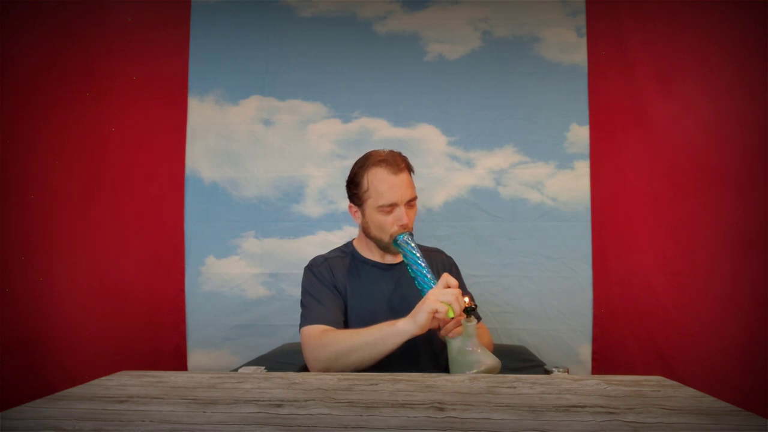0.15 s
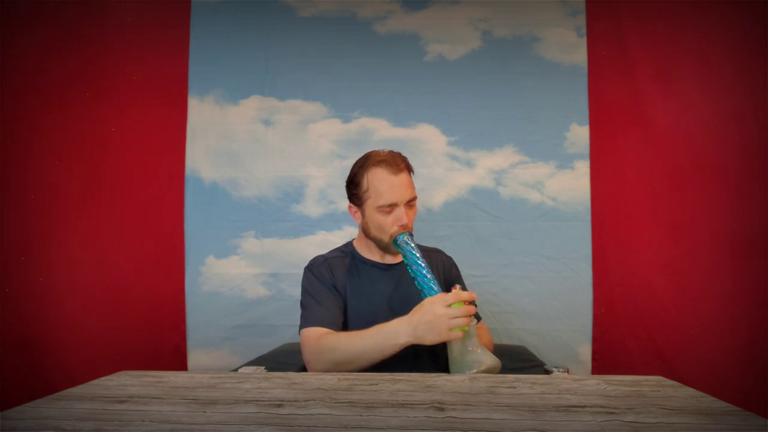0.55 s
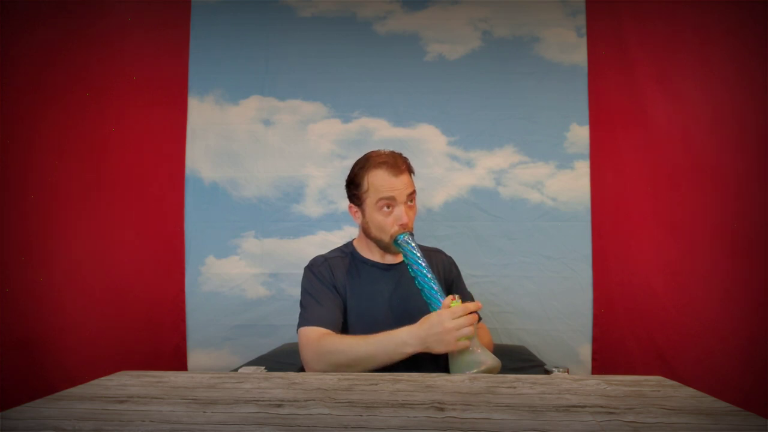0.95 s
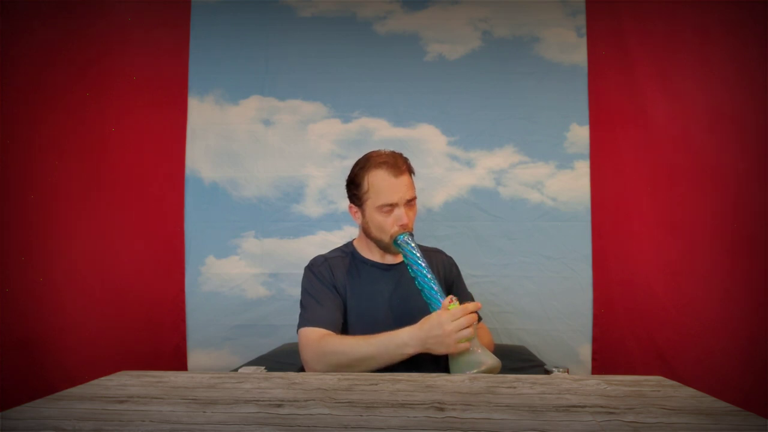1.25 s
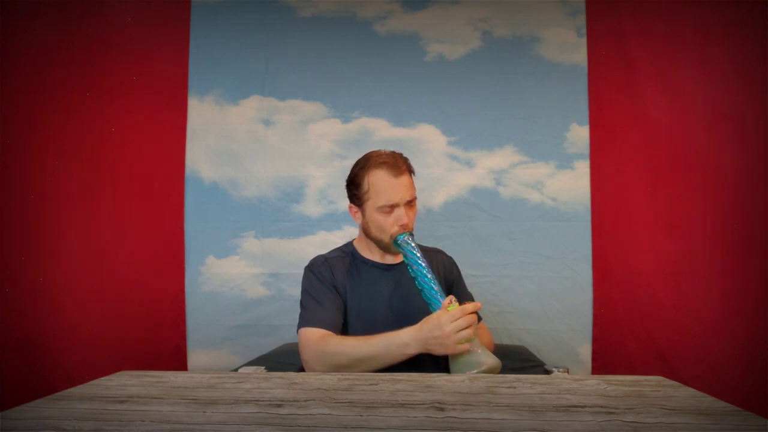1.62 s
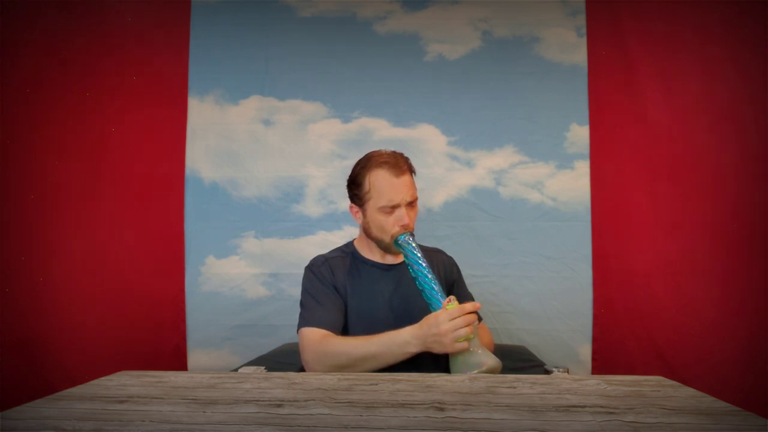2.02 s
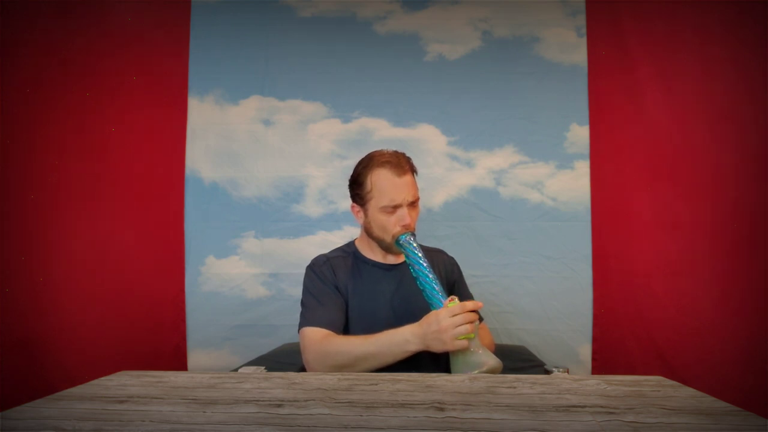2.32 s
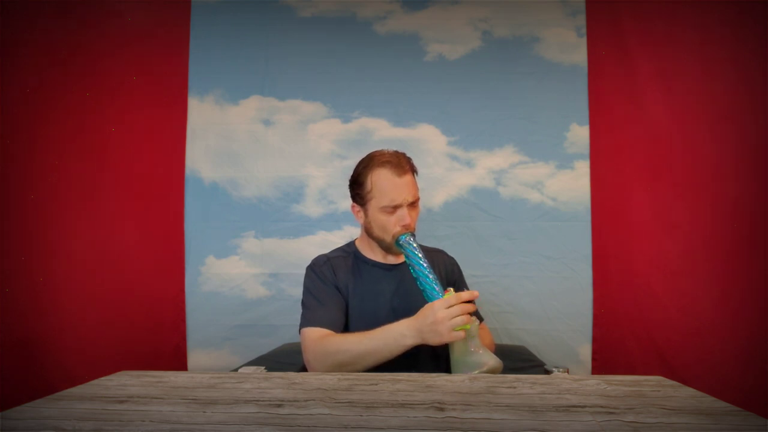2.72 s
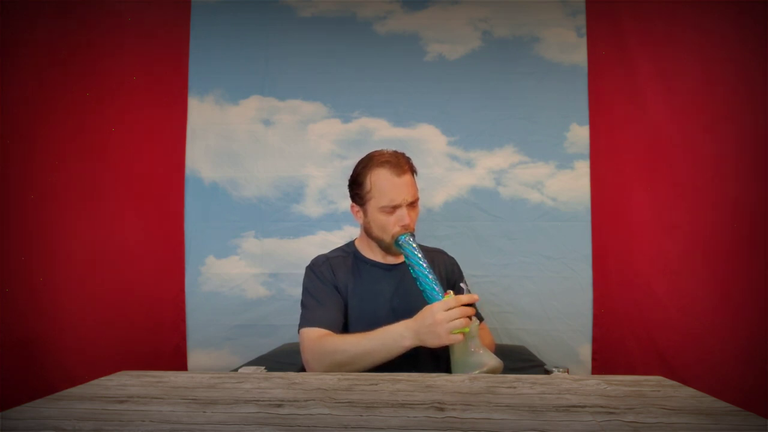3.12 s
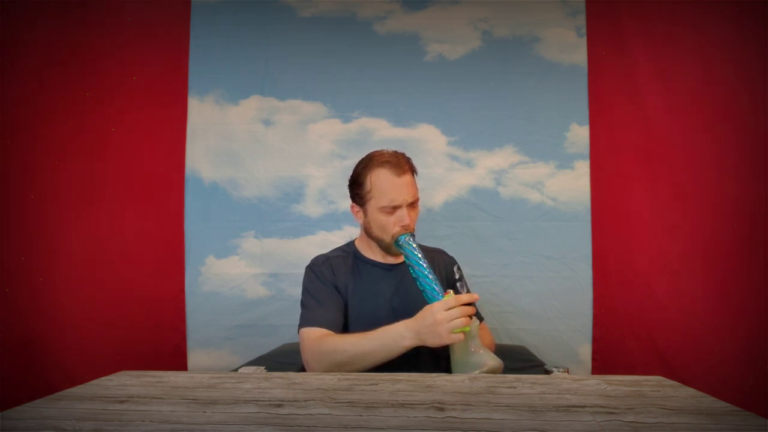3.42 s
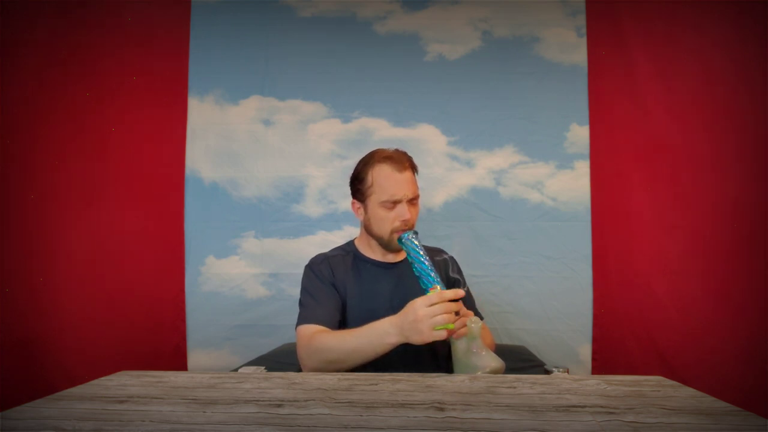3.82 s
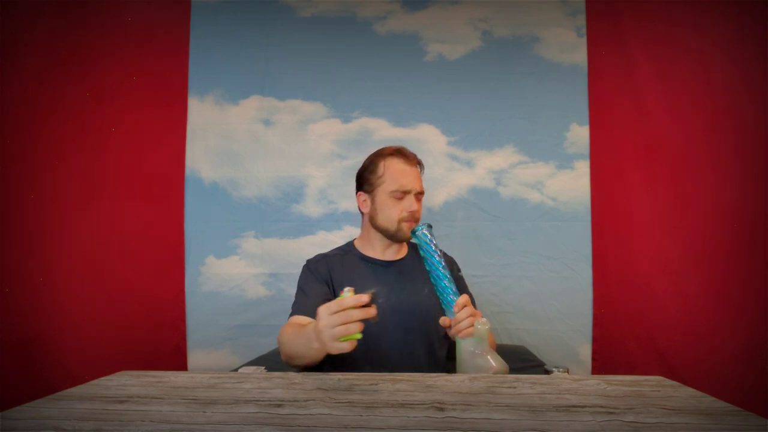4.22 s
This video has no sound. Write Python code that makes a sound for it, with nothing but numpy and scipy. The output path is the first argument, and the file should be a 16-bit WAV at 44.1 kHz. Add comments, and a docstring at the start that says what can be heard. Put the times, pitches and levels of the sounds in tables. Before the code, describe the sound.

In a quiet, slightly live room, a glass water pipe sits a little way from one microphone. Faint plips and light glass ticks come first, then the bowl scrapes out of its joint with a bright clink around two seconds. A thin airy whistle leads into fast, dense bubbling that swells, gurgling and spraying, then stops suddenly with a few last bubbles, leaving low room rumble.

```python
"""In a quiet, slightly live room, a glass water pipe is smoked a little way off from one microphone.
A gentle draw makes the water plip, as decaying sines of rising pitch, and fingers tick on the glass,
as noise bursts through its resonances. The bowl scrapes out of its joint as irregular slips, then
air rushes through the water: swarms of bubbles swell into a gurgle with spray and a heaving air column.
It stops with a last few bubbles; whistles are noise bands, handling rustles in grains, the room rumbles."""
import sys
import numpy as np
from scipy import signal
from scipy.fft import rfft, irfft, next_fast_len
from scipy.io import wavfile
from scipy.ndimage import uniform_filter1d, map_coordinates

SR = 44100
rng = np.random.default_rng(int(sys.argv[2]) if len(sys.argv) > 2 else 0)


def unload_wav(signal):
    """Save mono or channel-first audio to the path in sys.argv[1] as 16-bit WAV at rate SR, clipped to [-1, 1]."""
    wavfile.write(
        sys.argv[1],
        SR,
        np.round(np.clip(np.atleast_2d(signal).T, -1, 1) * 32767).astype(np.int16),
    )


N = 191913  # samples

# The draw, gentle while the bowl is in and strong once it is out: time_s, flow_db (re full flow)
DRAW_FLOW = [(0.0, -26.5), (0.35, -22), (1.15, -31), (1.6, -25), (2.0, -30.5), (2.16, -19), (2.36, -20.5),
             (2.6, -8.5), (2.8, -6), (3.02, -4.5), (3.32, 0.5), (3.78, 0.5), (3.82, -18)]
# Big slugs of air burst through about five times a second: start_s, swell_db
AIR_SLUGS = [(2.526, 4), (2.695, 7), (2.881, 5.5), (3.092, 4), (3.311, 3.5), (3.549, 4), (3.742, 3.5)]
# How unevenly the air gulps through the water: time_s, unevenness_db
GULP_DEPTH = [(2.6, 3.5), (3.3, 3.5)]
# Colour of the bubbling mass: freq_hz, level_db (per Hz)
WATER_COLOUR = [(250, 3.5), (390, -21), (470, -5), (630, -3), (900, -1), (1250, -3), (1520, 4.5),
                (2000, -17), (2420, 3), (2800, -19), (4000, -1.5), (7000, -79)]
# Resonances of the water chamber: freq_hz, width_hz, level_db
CHAMBER_MODES = [(477.6, 5, 11.5), (515, 24, -7.5), (606, 3.6, 9.5), (736, 12.4, 4), (934, 19, -26),
                 (1020, 33, 0.5), (1420, 27, -5.5), (1544, 23, -0.5), (2310, 57, 2), (2440, 46, -23)]
# Colour of the spray: freq_hz, level_db (per Hz)
SPRAY_COLOUR = [(1200, -5), (2400, -3), (3150, -3.5), (3700, -6.5), (5000, -0.5), (6200, -7), (6800, -6),
                (7300, -16.5), (8000, -12), (9500, -15), (11000, -26), (15000, -40)]
# Resonances of the air column in the tube: freq_hz, width_hz, level_db
TUBE_MODES = [(57.7, 42, 0), (108.4, 29, -5.5), (195.6, 28, -1.5), (264, 23, -6), (315, 15, -27)]
# Single loud bubbles: start_s, ring_peak_db, pitch_hz
LOUD_BUBBLES = [(0.0883, -55.5, 2430), (0.43, -52, 1140), (0.4882, -56, 2210), (0.87, -53.5, 1170),
                (1.2267, -59, 763), (1.5363, -51, 1404), (1.6388, -56, 1411), (1.768, -55.5, 1224),
                (1.8468, -57.5, 2465), (2.135, -49.5, 436), (2.3712, -45, 1260), (2.5307, -37, 752),
                (2.5312, -42, 1160), (2.5805, -35, 682), (2.6432, -38, 465), (2.6711, -32.5, 4850),
                (2.7006, -31, 1000), (2.709, -29.5, 3090), (2.7161, -35.5, 4880), (2.7201, -39.5, 3160),
                (2.8856, -41, 716), (2.8947, -35, 636), (2.9321, -35, 2290), (2.9436, -45, 1500),
                (3.1, -29, 1590), (3.1236, -33, 765), (3.2258, -31.5, 4820), (3.2552, -35.5, 507),
                (3.317, -29.5, 1735), (3.3255, -32.5, 634), (3.4308, -35, 910), (3.478, -28, 5040),
                (3.5576, -31, 510), (3.5791, -30, 2440), (3.623, -34, 1570), (3.6406, -31, 700),
                (3.6838, -34.5, 704), (3.75, -33, 1670), (3.7652, -31, 590), (3.7747, -30, 4170),
                (3.7765, -36.5, 2510), (3.8316, -35, 544), (3.8445, -31.5, 840)]
# Distinct contacts on the glass: start_s, peak_db, low_db (re middle), high_db (re middle)
GLASS_TAPS = [(.078, -54.5, 15, -11), (.248, -58, 14, -11), (.262, -49.5, 12, 4), (.702, -46, -24, -1),
              (.796, -34.5, 5, 10), (.819, -39.5, -1, -5), (.831, -42, 6, -25), (.944, -45, -14, -5),
              (1.048, -43.5, -16, 9), (1.477, -48, 1.5, -16), (1.534, -53.5, -18, -14),
              (1.744, -55, 6, -24), (2.084, -22.5, -5.5, -4), (2.12, -30.5, -11, -13),
              (2.131, -28.5, 0.5, -7.5), (2.372, -44, 5, -16)]
# Resonances of pipe and bowl: freq_hz, width_hz, level_db
GLASS_MODES = [(1090, 46, -9.5), (1400, 20, 3), (2290, 180, 11), (2480, 26, -22.5), (3020, 53, -27),
               (3157, 390, 7), (3580, 89, 15), (4100, 28, -14), (5500, 23, 2)]
# What the glass radiates: freq_hz, level_db (per Hz)
GLASS_COLOUR = [(150, -28), (430, -9), (930, -3), (1020, 5.5), (1800, -5.5), (2600, 0.5), (4500, -1),
                (6400, -4.5), (6850, -19), (15000, -39)]
# Glass left ringing by a touch: start_s, level_db, pitch_hz, t60_s
GLASS_RINGS = [(1.048, -68, 3520, 0.71), (1.048, -67.5, 4640, 0.22), (.796, -48, 2340, 0.038),
               (.796, -47, 4210, 0.019), (1.535, -75.5, 3500, 0.8), (2.084, -49.5, 1408, 0.78),
               (2.084, -47, 1080, 0.14)]
# Air whistling in the open stem: start_s, end_s, pitch_hz, width_hz, level_db
STEM_WHISTLES = [(2.37, 2.53, 2440, 260, -69), (2.50, 2.69, 2440, 260, -59.5), (2.57, 2.67, 3920, 400, -60),
                 (2.53, 2.68, 11300, 500, -80.5), (2.82, 2.92, 9600, 1200, -72.5)]
# Decay of the room: freq_hz, t60_s
ROOM_DECAY = [(100, 0.52), (300, 0.43), (800, 0.55), (3000, 0.49), (6000, 0.45), (12000, 0.6)]
# Colour of the room's rumble: freq_hz, level_db (per Hz)
RUMBLE_COLOUR = [(10, -50), (24, -15), (38, -4), (65, -1.5), (105, -3.5), (160, -11.5), (280, -14.5),
                 (500, -24.5), (1300, -26), (2000, -37.5), (3000, -34.5), (4500, -32.5), (7300, -40.5),
                 (15500, -44.5)]
# Level below which the right channel's noise suppressor acts: freq_hz, threshold_db (per bin)
SUPPRESSOR_THRESHOLD = [(60, -60), (300, -58), (1000, -71.5), (3000, -81), (6000, -85), (11000, -68)]

STOP_S = 0.032  # the water settles this fast when the draw ends
SLUG_ATTACK_S, SLUG_HOLD_S, SLUG_RELEASE_S = 0.0031, 0.01, 0.048
SLUG_SPRAY, SLUG_HEAVE = 0.43, 0.53  # shares of a slug's swell that reach spray and air column
# Levels at full flow: bubbling mass, droplets, finest fizz, rocking water
GURGLE_DB, SPRAY_DB, FIZZ_DB, HEAVE_DB = -48, -49.5, -47, -49
SPRAY_GROWS, FIZZ_GROWS, HEAVE_GROWS = 1.48, 2.07, 0.67  # dB per dB of flow
FIZZ_HZ = 5800  # the fizz is the spray above this pitch
# Small, high bubbles ring for more cycles: cycles at full flow, at this pitch, power of pitch
LIFE_CYCLES, LIFE_AT_HZ, LIFE_GROWS = 17, 1020, 0.56
LIFE_DAMPED = 0.18  # churning water cuts the ring short: dB of life lost per dB of flow
# A loud bubble's splash: level re its ring at full flow, dB per dB of flow, decay time
SPLASH_DB, SPLASH_GROWS, SPLASH_S = 0, 0.37, 0.003
SPLASH_SKIRT_DB = -14  # fall of the splash at a third and at three times the bubble's pitch
# The shifting grip ticks faintly at random
GRIP_START_S, GRIP_END_S = 0.26, 2.1
GRIP_DB, GRIP_SPREAD_DB, GRIP_LOW_DB, GRIP_HIGH_DB = -62, 4, 6.5, -2
RUSTLE_DB, RUSTLE_END_S, RUSTLE_FADE_S = -80.5, 1.0, 0.091  # faint grainy rustle under the handling
RUB_S, RUB_WIDTH_S, RUB_DB = 0.75, 0.04, 14.5  # a finger rubs across the glass: swell over the rustle
TOP_HZ = 15600  # upper band limit


def amp(db):
    """Decibels to gain."""
    return 10 ** (np.asarray(db) / 20)


def unit(x):
    """Scale to rms 1."""
    return x / np.sqrt(np.mean(x ** 2) + 1e-20)


def along(points, hz):
    """Read (Hz, value) points on a log frequency axis."""
    freq, value = np.transpose(points)
    return np.interp(np.log(hz + 1), np.log(freq + 1), value)


def filtered(x, response):
    """Shape the spectrum of x with a response of frequency."""
    n = x.shape[-1]
    padded = next_fast_len(n + SR // 4)
    spectrum = rfft(x, padded) * response(np.fft.rfftfreq(padded, 1 / SR))
    return irfft(spectrum, padded)[..., :n]


def coloured(x, points):
    """Causal, minimum-phase filter with the gain of (Hz, dB) points."""
    size = 4096
    gain = amp(along(points, np.fft.rfftfreq(size, 1 / SR)))
    cepstrum = irfft(np.log(gain))
    # folding the cepstrum puts the energy as early as possible
    cepstrum[1:size // 2] *= 2
    cepstrum[size // 2 + 1:] = 0
    impulse = irfft(np.exp(rfft(cepstrum)))
    return signal.fftconvolve(x, impulse)[:len(x)]


def resonate(x, modes):
    """Pass x through parallel (Hz, width, dB) resonances."""
    def response(f):
        return sum(amp(db) * 1j * f * w / (c * c - f * f + 1j * f * w) for c, w, db in modes)
    return filtered(x, response)


def narrow(hz, width, size):
    """Noise of rms 1 in one narrow band."""
    noise = rng.standard_normal(size)
    return unit(filtered(noise, lambda f: 1 / (1 + (2 * (f - hz) / width) ** 4)))


def add(track, s, sound):
    """Mix a sound into a track at s seconds."""
    part = track[max(round(s * SR), 0):][:len(sound)]
    part += sound[:len(part)]


def bubble(t, hz, life, rise):
    """A pocket of air falls 60 dB in life cycles; its pitch climbs as it nears the surface."""
    turns = t * hz
    age = turns / life
    envelope = amp(-60 * age) * (1 - np.exp(-2 * turns))
    return envelope * np.sin(2 * np.pi * turns * (1 + rise * age / 2))


def swarm(rate, low_hz, high_hz, life, spread_db, size):
    """Countless ringing grains of random moment, pitch, life and strength, at rms 1; rate per second."""
    u = rng.random((int(rate * N / SR), 5))
    hz = low_hz * (high_hz / low_hz) ** u[:, 1:2]
    lives = life * 2 ** (2 * u[:, 3:4] - 1)
    boost_db = spread_db * np.minimum(-np.log(u[:, 2:3]), 3)
    polarity = np.sign(u[:, 4:5] - .5)
    strength = amp(boost_db) * np.sqrt(hz / low_hz) * polarity
    grains = strength * bubble(np.arange(size) / SR, hz, lives, rise=0.26)
    where = (u[:, :1] * N).astype(int) + np.arange(size)
    return unit(np.bincount(where.ravel(), grains.ravel(), N)[:N])


def bubbling():
    """One air flow heaves the air column, frees ringing bubbles and throws spray, finer as it grows."""
    t = np.arange(N) / SR
    flow_db = np.interp(t, *np.transpose(DRAW_FLOW))
    slug_db = slugs()
    drawing = np.clip(1 - (t - DRAW_FLOW[-1][0]) / STOP_S, 0, 1)
    gurgle_gain = amp(GURGLE_DB + flow_db + slug_db)
    spray_gain = amp(SPRAY_DB + SPRAY_GROWS * flow_db + SLUG_SPRAY * slug_db)
    fizz_gain = amp(FIZZ_DB + FIZZ_GROWS * flow_db + SLUG_SPRAY * slug_db)
    heave_gain = amp(HEAVE_DB + HEAVE_GROWS * flow_db + SLUG_HEAVE * slug_db)
    gulps = surges(rate=70)

    mass = swarm(rate=750, low_hz=391.0, high_hz=3660, life=12.5, spread_db=1.5, size=1600)
    chamber = unit(resonate(mass, CHAMBER_MODES))
    body = unit(unit(coloured(mass, WATER_COLOUR)) + amp(-8.5) * chamber)

    droplets = swarm(rate=2000, low_hz=2033, high_hz=13400, life=23.0, spread_db=3.5, size=600)
    drops = unit(coloured(droplets, SPRAY_COLOUR))
    coarse = filtered(drops, lambda hz: 1 / (1 + (hz / FIZZ_HZ) ** 10))
    fizz = drops - coarse

    rocking = swarm(rate=400, low_hz=55.7, high_hz=372.5, life=4.0, spread_db=2.5, size=2000)
    churn = resonate(rocking, TUBE_MODES)
    column = unit(coloured(churn, [(25, -17), (50, -7.0), (100, 5)]))

    gulping = gulps * (gurgle_gain * body + spray_gain * coarse + fizz_gain * fizz)
    return drawing * (gulping + heave_gain * column)


def slugs():
    """Swell in dB: each slug of air bursts quickly, holds and dies away."""
    t = np.arange(N) / SR
    corners = np.cumsum([0, SLUG_ATTACK_S, SLUG_HOLD_S, SLUG_RELEASE_S])
    return sum(db * np.interp(t - s, corners, [0, 1, 1, 0]) for s, db in AIR_SLUGS)


def surges(rate):
    """Air breaks through in uneven gulps: smooth random gain, its mean power held about constant."""
    t = np.arange(N) / SR
    knots = rng.standard_normal(int(N * rate / SR) + 4)
    depth_db = np.interp(t, *np.transpose(GULP_DEPTH))
    wander = map_coordinates(knots, [t * rate])
    return amp(depth_db * wander - depth_db ** 2 * np.log(10) / 20)


def plops():
    """Loud bubbles stand out singly; calm water lets them ring, churning water makes them splash."""
    out = np.zeros(N)
    t = np.arange(SR // 10) / SR
    for s, db, hz in LOUD_BUBBLES:
        flow_db = np.interp(s, *np.transpose(DRAW_FLOW))
        life = LIFE_CYCLES * (hz / LIFE_AT_HZ) ** LIFE_GROWS * amp(-LIFE_DAMPED * flow_db)
        ring = bubble(t, hz, life, rise=0.033)
        burst = rng.standard_normal(len(t)) * np.exp(-t / SPLASH_S)
        around_pitch = [(hz / 10, -40), (hz / 3, SPLASH_SKIRT_DB), (hz, 0),
                        (hz * 3, SPLASH_SKIRT_DB), (hz * 10, -40)]
        splash = coloured(burst, around_pitch)
        splash = coloured(splash, [(5500, 0), (7000, -22), (12000, -22.5)])  # dull the top
        splash_gain = amp(SPLASH_DB + SPLASH_GROWS * flow_db)
        plop = ring / np.abs(ring).max() + splash_gain * splash / np.abs(splash).max()
        add(out, s, amp(db) * plop)
    return out


def bowl():
    """The glass rings unsteadily in the hand; the bowl grinds out of its ground-glass joint."""
    out = np.zeros(N)
    t = np.arange(SR // 2) / SR
    for s, db, hz, t60 in GLASS_RINGS:
        add(out, s, amp(db - 60 * t / t60) * narrow(hz, width=230, size=len(t)))
    # it grinds hardest just before it comes free
    stroke = np.interp(t, [0, .003, .03, .04, .054, .06], [0.83, 0.83, 0.2, 0.71, 1, 0.041])
    slips = rng.standard_normal(len(t)) * (rng.random(len(t)) < .025)
    add(out, 2.080, amp(-57.5) * contact(slips * stroke, ring_db=-5.5))
    return out


def taps(count=12):
    """Fingers, lighter and bowl knock on the pipe, with faint ticks of the grip in between."""
    out = np.zeros(N)
    for s, db, low_db, high_db in GLASS_TAPS:
        add(out, s, tap(db, low_db, high_db))
    for k in range(count):
        s = GRIP_START_S + (GRIP_END_S - GRIP_START_S) * (k + rng.random()) / count
        db = GRIP_DB + GRIP_SPREAD_DB * rng.standard_normal()
        add(out, s, tap(db, GRIP_LOW_DB, GRIP_HIGH_DB))
    return out


def tap(db, low_db, high_db):
    """One short contact on the glass, a decaying noise force with its own hardness."""
    t = np.arange(SR // 5) / SR
    force = rng.standard_normal(len(t)) * np.exp(-t / 0.0016)
    soft_db = min(0, 0.89 * (db + 25))  # light touches lack the top
    tone = [(1400, low_db), (2400, 0), (3800, high_db), (5000, high_db), (6000, high_db + soft_db)]
    hit = coloured(contact(force, ring_db=-17), tone)
    return amp(db) * hit / np.abs(hit).max()


def contact(force, ring_db):
    """A force on the glass gives a dry crack and rings its resonances."""
    ring = unit(resonate(force, GLASS_MODES))
    return unit(coloured(unit(force) + amp(ring_db) * ring, GLASS_COLOUR))


def whistles():
    """Air sings briefly over the wet rim of the stem, as narrow bands of noise."""
    out = np.zeros(N)
    for start, end, hz, width, db in STEM_WHISTLES:
        size = max(int((end - start) * SR), 64)
        add(out, start, amp(db) * signal.windows.tukey(size, .5) * narrow(hz, width, size))
    return out


def rustling():
    """Faint grainy rustle under the handling, fading out after 1 s, with one finger rub on the glass."""
    t = np.arange(N) / SR
    rub = np.exp(-((t - RUB_S) / RUB_WIDTH_S) ** 2)
    fade = np.clip(1 - (t - RUSTLE_END_S) / RUSTLE_FADE_S, 0, 1)
    grains = swarm(rate=850, low_hz=2980, high_hz=4800, life=32, spread_db=7, size=400)
    return amp(RUSTLE_DB + RUB_DB * rub) * fade * grains


def room(x, count=22):
    """The walls answer each slice of sound with a fresh diffuse tail, decaying per frequency."""
    out = np.zeros(N)
    hop = N // count + 1
    for start in range(0, N, hop):
        hz, t, z = signal.stft(rng.standard_normal(SR // 2), SR, nperseg=256)
        decay = amp(-60 * t / along(ROOM_DECAY, hz)[:, None])
        tail = signal.istft(z * decay, SR, nperseg=256)[1]
        answer = signal.fftconvolve(x[start:start + hop], tail / np.linalg.norm(tail))
        add(out, start / SR + .004, answer)
    return out


def background():
    """Low room rumble, as steady coloured noise."""
    noise = rng.standard_normal(N)
    return amp(-64.0) * unit(filtered(noise, lambda hz: amp(along(RUMBLE_COLOUR, hz))))


def suppress(x, depth_db, knee_db):
    """Turn down every band whose smoothed level lies under the threshold."""
    hz, _, z = signal.stft(x, SR, nperseg=1024)
    smooth = uniform_filter1d(np.abs(z) ** 2, size=7, axis=0)  # across frequency
    power = np.abs(uniform_filter1d(smooth, size=3, axis=1))  # across time
    over_db = 10 * np.log10(power + 1e-20) - along(SUPPRESSOR_THRESHOLD, hz)[:, None]
    gain = amp(depth_db * np.clip(.5 - over_db / knee_db, 0, 1))
    return signal.istft(z * gain, SR, nperseg=1024)[1][:N]


def scene():
    """One microphone feeds both channels; a shielding hand at first favours the plops' way by the walls."""
    bubbles = plops()
    rest = bubbling() + whistles() + rustling() + taps() + bowl()
    shielded = amp(np.interp(np.arange(N) / SR, [2.3, 2.5], [6, 0]))
    reverb = amp(-1.5) * room(shielded * bubbles + rest)
    heard = bubbles + rest + reverb + background()
    return np.array([heard, heard])


def record(dry):
    """The right channel passes a mild noise suppressor; each channel has its own hiss and a band limit."""
    pair = np.array([dry[0], suppress(dry[1], depth_db=-5.0, knee_db=3.5)])
    hiss = amp(-80.0) * rng.standard_normal((2, N))
    return filtered(pair + hiss, lambda hz: hz < TOP_HZ)


dry = scene()
out = record(dry)
unload_wav(out)
```